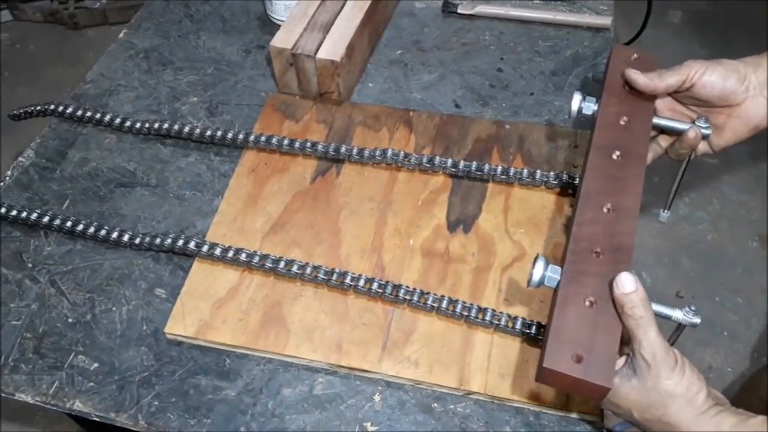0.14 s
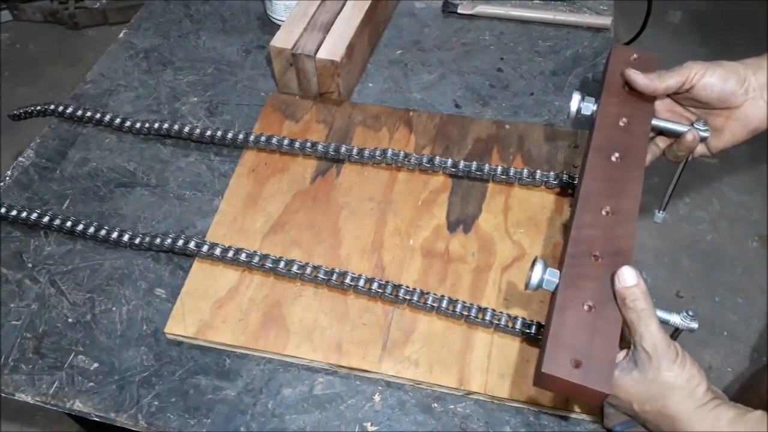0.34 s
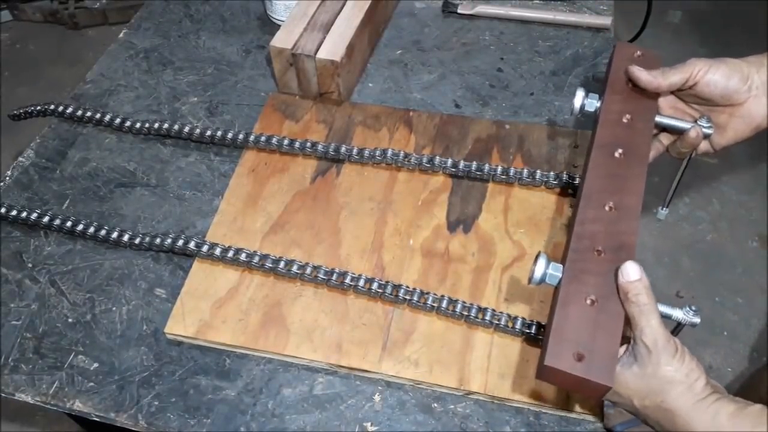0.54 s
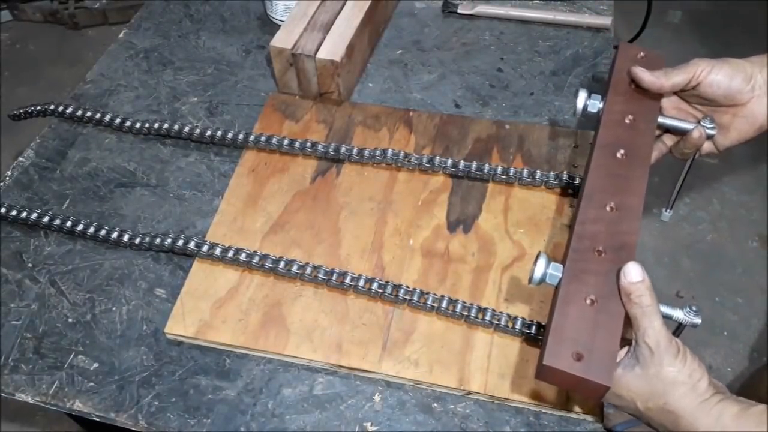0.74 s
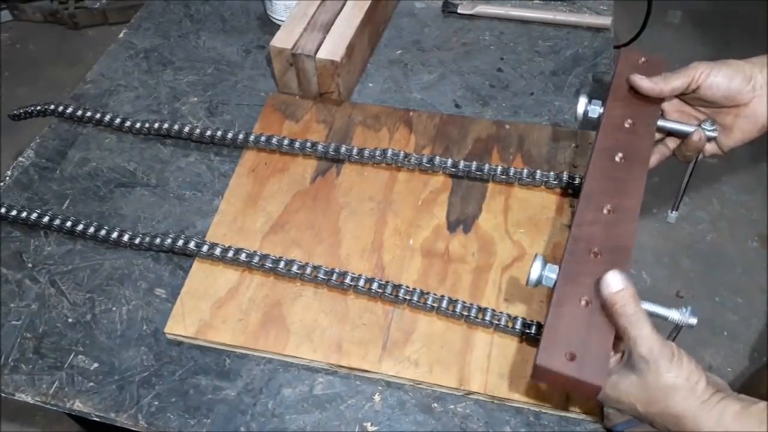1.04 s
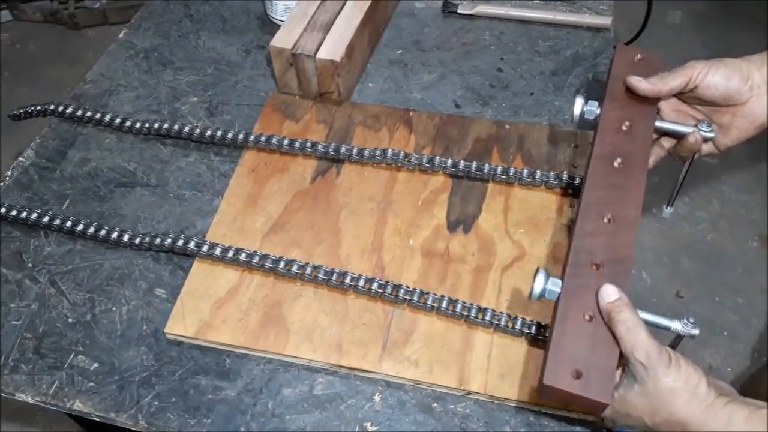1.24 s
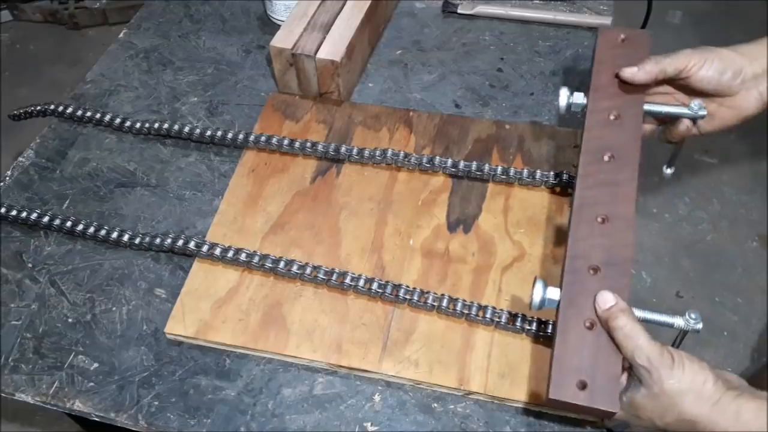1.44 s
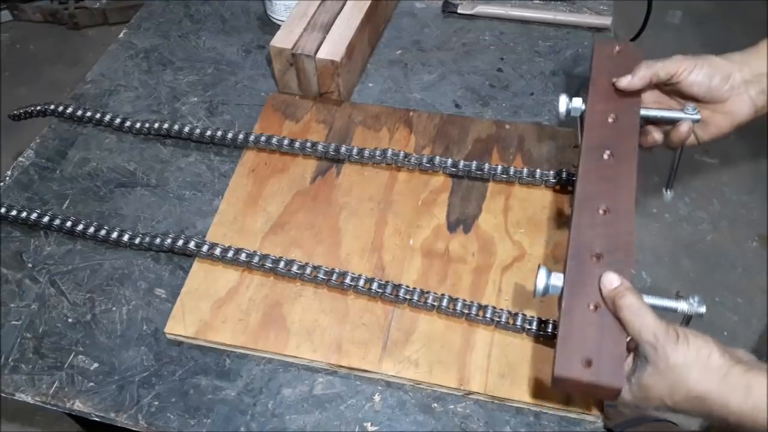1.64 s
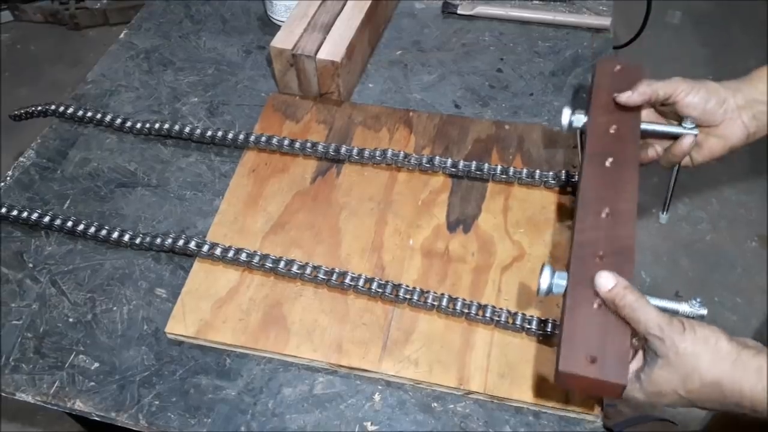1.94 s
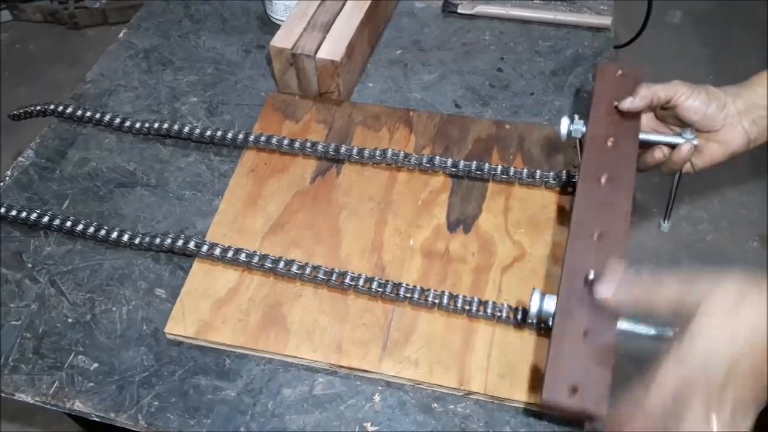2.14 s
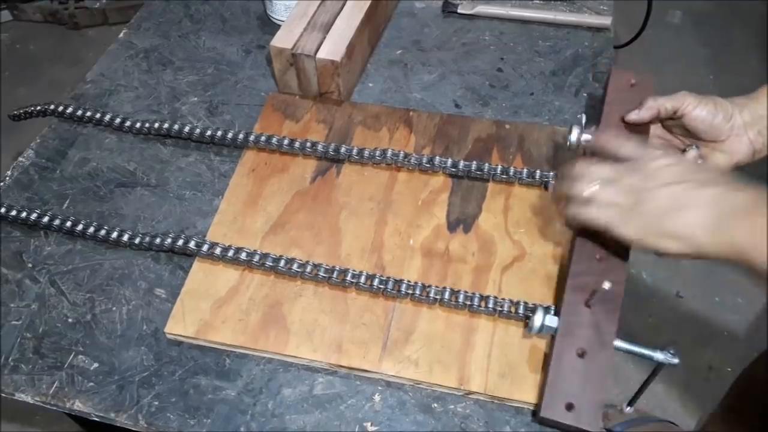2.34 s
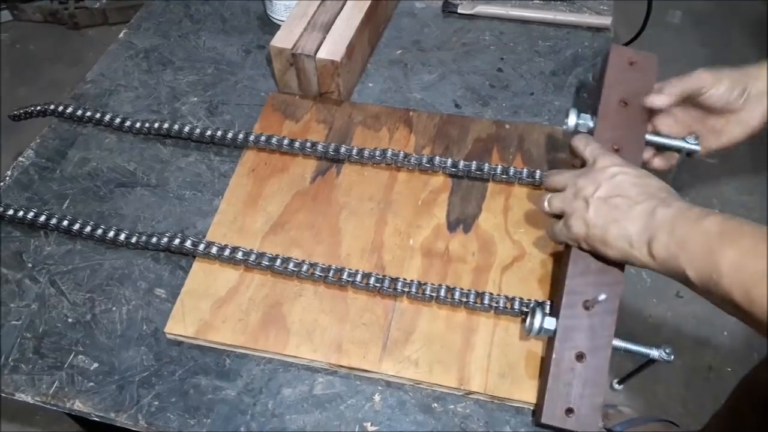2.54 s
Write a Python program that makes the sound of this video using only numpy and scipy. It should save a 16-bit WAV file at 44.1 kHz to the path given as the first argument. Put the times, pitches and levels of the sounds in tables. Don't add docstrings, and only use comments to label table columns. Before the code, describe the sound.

A wooden bar carrying steel screws and chains is nudged over plywood with dull bumps and faint rubbing, then drops with a hard clack, thin steel ringing and a final metal tick; close microphone, quiet workshop.

```python
import sys
import numpy as np
from scipy import signal
from scipy.io import wavfile

SR = 44100
rng = np.random.default_rng(int(sys.argv[2]) if len(sys.argv) > 2 else 0)


def store_pcm(level_fs):
    pcm = np.round(np.clip(level_fs, -1, 1) * 32767).astype(np.int16)
    wavfile.write(sys.argv[1], SR, np.atleast_2d(pcm).T)


def elevation(decibels):
    levels = np.asarray(decibels, float)
    return 10 ** (levels / 20)


N = 119070

# (frequency [Hz], level [dB], t60 [s])
BOARD_MODES = [(102, -19, 0.076), (144.8, -3, 0.12), (234, -2, 0.11), (274, -5.5, 0.085), (343, -0.5, 0.13),
               (402.7, -0.5, 0.085), (473, -2, 0.074), (541, -0.5, 0.021), (644, -6, 0.035),
               (763, -1.5, 0.031), (1055, 2.5, 0.023), (1232, -3.5, 0.039), (1570, -4.5, 0.011),
               (2140, -7, 0.015), (2650, -3, 0.012)]


def rms_one(x):
    return x / np.sqrt(np.mean(x ** 2) + 1e-20)


def at_hz(points, hz):
    table_hz, values = np.transpose(points)
    return np.interp(np.log(hz), np.log(table_hz), values)


def drift(rate_hz):
    r = np.exp(-40 * np.pi * rate_hz / SR)
    slow = signal.lfilter([1], [1, -2 * r, r * r], rng.standard_normal(N // 20 + 2002))[2000:]
    return np.interp(np.arange(N) / 20, np.arange(len(slow)), rms_one(slow - slow.mean()))


def ring(clicks, hz, t60):
    r = elevation(-60 / (t60 * SR))
    w = 2 * np.pi * hz / SR
    return signal.lfilter([0, np.sin(w)], [1, -2 * r * np.cos(w), r * r], clicks + 1e-18)


def band_noise(noise, low_hz, high_hz, order=2):
    return signal.sosfilt(signal.butter(order, [low_hz, high_hz], "band", fs=SR, output="sos"), noise)


def low_pass(x, hz, order=2):
    return signal.sosfilt(signal.butter(order, hz, fs=SR, output="sos"), x)


def bands():
    edges = 25 * 2 ** np.arange(0, 9.6, .5)
    white = rng.standard_normal((2, N))
    for k, (low, high) in enumerate(zip(edges, edges[1:])):
        yield np.sqrt(low * high), band_noise(white[k % 2], low, high)


def clicks_at(s, gain):
    out = np.zeros(N)
    np.add.at(out, (np.asarray(s) * SR).astype(int), gain)
    return out


def insects():
    throb_per_s, throb_peak_s, throb_db = 7.33, .015, 3.5
    pulses_per_s, pulse_db = 450, 3
    t = np.arange(N) / SR
    throb = np.tanh(1.6 * np.cos(2 * np.pi * throb_per_s * (t - throb_peak_s)))
    pulses = np.cos(2 * np.pi * pulses_per_s * t + 0.85 * drift(5.7))
    level_db = throb_db * throb + pulse_db * pulses + 1.87 * drift(1.54)
    noise = rng.standard_normal(N) * elevation(level_db)
    return elevation(-68) * rms_one(band_noise(noise, 6157, 6756, order=4))


def air():
    # (frequency [Hz], density [dB per Hz])
    spectrum = [(35, -33), (70, 7), (160, 5), (730, -11), (2000, -17.5), (5000, -16.5), (10000, -21),
                (16000, -22)]
    tone = sum(elevation(at_hz(spectrum, hz) + drift(9.3)) * noise for hz, noise in bands())
    return elevation(-70.5) * rms_one(tone)


def drag():
    # (start [s], length [s], level [dB], brightness [dB per octave])
    strokes = [(0, 0.1, -71, -5), (0.236, 0.21, -61, -15), (0.358, 0.097, -50.5, -11.5),
               (0.548, 0.12, -68.5, -7.5), (0.699, 0.064, -72.5, -1), (0.872, 0.085, -55, -10),
               (1.04, 0.11, -42.5, -5), (1.119, 0.063, -42.5, -9.5), (1.193, 0.36, -80, 0.5),
               (1.474, 0.16, -54.5, -7), (1.57, 0.13, -54, -7), (1.69, 0.75, -60, -8.5),
               (1.928, 0.29, -55.5, -2.5), (1.965, 0.16, -50.5, -17), (2.121, 0.53, -52.5, -2.5),
               (2.483, 0.087, -37.5, -4.5)]
    rise_s, fall_s = 0.005, 0.075
    slips_per_s, spread_db = 390, 0
    t, out = np.arange(N) / SR, 0
    shapes = []
    for s, length, _, _ in strokes:
        fall = np.exp(-np.maximum(t - s - length + fall_s, 0) / fall_s)
        shapes.append(np.clip((t - s) / rise_s, 0, 1) * fall)
    judder = elevation(1.4 * drift(45))
    for hz, level_db, t60 in BOARD_MODES[:-1]:
        sizes = elevation(spread_db * np.minimum(rng.exponential(1, N), 4)) * rng.choice([-1, 1], N)
        slips = rms_one(sizes * (rng.random(N) < slips_per_s / SR))
        power = 0
        for (_, _, db, slope_db), shape in zip(strokes, shapes):
            power = power + (elevation(db + slope_db * np.log2(hz / 200)) * shape) ** 2
        rumble = ring(slips * np.sqrt(power) * judder, hz, 0.33 * t60)
        out = out + rumble * elevation(level_db) / np.sqrt(t60 * SR / 46)
    return elevation(-4) * out


def rubs():
    # (start [s], length [s], level [dB], centre [Hz], width [Hz])
    strokes = [(0.252, 0.074, -78, 4500, 1300), (0.251, 0.088, -73, 8700, 1600),
               (1.043, .076, -70.5, 7400, 5100), (1.052, 0.11, -73, 5030, 310),
               (1.046, 0.11, -63, 1850, 260), (1.132, .22, -73.5, 1804, 180), (1.053, .12, -76, 3170, 280),
               (1.315, 0.53, -79.5, 8360, 1300), (1.7, 0.36, -77, 3650, 500),
               (1.49, 0.86, -78.5, 5340, 570), (1.6, 0.32, -74.5, 4600, 3400), (2.3, .065, -51, 530, 390),
               (1.935, 0.18, -66.5, 2200, 240), (1.939, 0.18, -60.5, 1210, 260),
               (1.481, 0.039, -63, 540, 52), (1.721, 0.076, -74, 1165, 130), (1.55, 0.28, -82.5, 2170, 520),
               (1.936, 0.206, -74.5, 8500, 4800), (0.393, 0.066, -79, 1830, 520),
               (2.075, 0.29, -66, 6100, 4000), (2.6, 0.19, -67, 9800, 4300),
               (2.125, 0.08, -57.5, 2760, 610), (2.171, 0.18, -62, 1710, 440)]
    rise_share, fall_share, flicker_db = 0.13, .5, 3
    t, out = np.arange(N) / SR, 0
    for s, length, db, hz, width_hz in strokes:
        noise = band_noise(rng.standard_normal(N), max(hz - width_hz / 2, 50), hz + width_hz / 2)
        rise = (t - s) / (rise_share * length)
        fall = (s + length - t) / (fall_share * length)
        shape = np.clip(np.minimum(rise, fall), 0, 1)
        out = out + elevation(db + flicker_db * drift(44)) * shape * rms_one(noise)
    return out


def knocks():
    # (time [s], peak level [dB], contact cut-off [Hz])
    contacts = [(0.283, -44.5, 402), (0.372, -29, 324), (.372, -53, 1300), (0.384, -32.5, 280),
                (0.913, -43, 403), (1.049, -55, 800), (1.079, -46, 700), (1.165, -28.5, 460),
                (1.177, -41.5, 1450), (1.988, -39, 420), (1.492, -50.5, 800), (2.2544, -33, 500),
                (2.271, -14, 3000), (2.2721, -2.5, 2080), (2.2727, -1, 2090), (2.275, -11, 1000),
                (2.2835, -4.5, 780), (2.2917, -8, 700), (2.305, -9, 2020), (2.453, -13.5, 1404),
                (2.457, -21, 1900), (2.467, -15, 600)]
    # (frequency [Hz], density [dB per Hz])
    rustle_spectrum = [(60, -36), (130, -7.5), (460, 2), (750, -6.5), (1250, -3.5), (3000, -17),
                       (8000, -20.5), (16000, -31)]
    # (frequency [Hz], t60 [s])
    rustle_t60 = [(100, 0.073), (1500, 0.066), (12000, 0.35)]
    soft_hz, rattle_from_hz, hard_bass_share = 600, 660, 0.23
    rustle_db, rustle_rise_s, grain_spread_db = -11.5, 0.00072, 3.5
    soft_slope, crack_db = 1.52, -51
    out = np.zeros(N)
    luck = rng.standard_normal((len(contacts), len(BOARD_MODES)))
    s, db, cut_hz = np.transpose(contacts)
    soft = cut_hz < soft_hz
    for k, (hz, level_db, t60) in enumerate(BOARD_MODES):
        bass = 1 / (1 + (hard_bass_share * cut_hz / hz) ** 2)
        reach = bass / (1 + (hz / cut_hz) ** 2) ** 1.17
        force = elevation(db + level_db - 12.0 + 3.75 * luck[:, k]) * reach
        padded = low_pass(clicks_at(s, force * soft) + 1e-18, soft_hz)
        out += ring(padded + clicks_at(s, force * ~soft), hz, t60)
    grain_db = grain_spread_db * drift(100)
    rise = np.exp(-1 / (rustle_rise_s * SR))
    loose = np.minimum(cut_hz / rattle_from_hz, 1) ** 2
    for hz, noise in bands():
        bass = 1 / (1 + (hard_bass_share * cut_hz / hz) ** 2)
        reach = bass / (1 + (hz / cut_hz / soft_slope) ** 2) ** 3
        reach = reach + elevation(crack_db) * (cut_hz > 1400)
        decay = elevation(-120 / (at_hz(rustle_t60, hz) * SR))
        power = signal.lfilter([1], [1, -decay], clicks_at(s, elevation(2 * db) * reach * loose) + 1e-18)
        power = signal.lfilter([1 - rise], [1, -rise], power)
        level_db = rustle_db + at_hz(rustle_spectrum, hz) + grain_db * (hz > 2000)
        out += 10 * elevation(level_db) * noise * np.sqrt(power)
    return out


def steel():
    # (time [s], peak level [dB], colour [Hz], link ring level [dB])
    ticks = [(1.584, -54.5, 8300, -39), (1.9366, -37.5, 6400, -19), (2.108, -52, 5500, -40),
             (2.128, -45.5, 2450, -17), (2.136, -43, 2800, -19), (2.142, -47, 5150, -35),
             (2.243, -43, 9400, -18), (2.158, -43, 5200, -16), (2.1692, -31.5, 5940, -18),
             (2.171, -45, 9900, -33), (2.1829, -31.5, 6550, -13), (2.5894, -21, 2160, -46),
             (2.2747, -17, 8100, -24), (2.2725, -17.5, 4560, -29), (2.2822, -21.5, 7100, -41),
             (2.287, -20, 7100, -22), (2.2862, -24, 12500, -36), (2.309, -27, 9500, -27),
             (2.3054, -12, 5000, -25.5), (2.4295, -43, 9500, -36), (2.454, -28.5, 8670, -43),
             (2.473, -40, 6900, -30), (2.5895, -28.5, 6850, -47)]
    # (frequency [Hz], level [dB], t60 [s])
    link_modes = [(9950, 0, .05), (5260, -8, .025), (3100, -8, .04)]
    # (frequency [Hz], level [dB], t60 [s])
    handle_modes = [(1725, -5, .1), (1800, -10, .06), (3085, -10, .16), (2960, -14, .12), (3200, -16, .06),
                    (5000, -14, .03), (3600, -16, .02)]
    tick_t60_s, broad_db = 0.0068, -8
    handle_s, handle_db, rattle_db, rattle_t60_s = 2.5895, -30, -35, 0.25
    out, t = np.zeros(N + SR), np.arange(800) / SR
    bursts = rng.standard_normal((len(ticks), 800)) * elevation(-60 * t / tick_t60_s)
    bursts = low_pass(np.diff(bursts, prepend=0), 13900)
    for (s, db, hz, _), burst in zip(ticks, bursts):
        tick = rms_one(ring(burst, hz, 9.0 / hz)) + elevation(broad_db) * rms_one(burst)
        start = int(s * SR)
        out[start:start + 800] += elevation(db) * tick / np.abs(tick).max()
    out = out[:N]
    s, db, _, link_db = np.transpose(ticks)
    link_clicks = clicks_at(s, elevation(db + link_db))
    since = np.arange(N) / SR - handle_s
    rattle = elevation(rattle_db - 60 * np.abs(since) / rattle_t60_s) * (since > 0) * rng.standard_normal(N)
    handle_clicks = elevation(handle_db) * (clicks_at([handle_s], 0.9) + rattle)
    for modes, clicks in ((link_modes, link_clicks), (handle_modes, handle_clicks)):
        rings = sum(elevation(level_db) * ring(clicks, hz, t60) for hz, level_db, t60 in modes)
        out = out + elevation(3.0 * drift(54)) * rings
    return out


def squeak():
    # (time [s], frequency [Hz], level [dB])
    glide = [
        (1.65, 7850, -84),
        (1.69, 7950, -76),
        (1.728, 8850, -78),
        (1.752, 8950, -104),
        (1.775, 8850, -79),
        (1.825, 8200, -78),
        (1.88, 7900, -84),
    ]
    s, hz, db = np.transpose(glide)
    t = np.arange(N) / SR
    phase = 2 * np.pi * np.cumsum(np.interp(t, s, hz) + 25 * drift(80)) / SR
    level_db = np.interp(t, s, db, left=-140, right=-140) + 6.0 * drift(62)
    return elevation(level_db) * np.sqrt(2) * np.sin(phase)


def screw():
    # (time [s], lower mode level [dB], upper mode level [dB], damped at [s], damping time [s])
    rings = [
        (1.937, -75, -63, 2.0, .04),
        (2.17, -70, -57, 2.178, .004),
        (2.2905, -28, -38, 2.305, .002),
        (2.3075, -34, -44, 2.345, .001),
        (2.346, -34, -40, 2.405, .022),
        (2.473, -57, -58, 2.54, .03),
        (2.5905, -49, -45, 2.65, .08),
    ]
    # (lower [Hz], upper [Hz])
    pair_hz = (8931, 8973)
    rise_s, t60_s = 0.0006, .6
    t, out = np.arange(N) / SR, 0
    for s, low_db, high_db, stop, damp_s in rings:
        rise = np.clip((t - s) / rise_s, 0, 1)
        damping = np.exp(-np.maximum(t - stop, 0) / damp_s)
        decay = elevation(-60 * np.maximum(t - s, 0) / t60_s)
        levels = zip(pair_hz, (low_db, high_db))
        tones = sum(elevation(db) * np.sin(2 * np.pi * hz * (t - s)) for hz, db in levels)
        out = out + rise * damping * decay * tones
    return out


def chain():
    # (start [s], swell [s], peak level [dB], fall [s])
    jostles = [
        (2.11, .075, -56.5, 0.05),
        (2.275, 0.015, -41.5, 0.015),
        (2.454, .01, -62, 0.016),
        (2.59, .01, -58, 0.02),
    ]
    # (frequency [Hz], level [dB], t60 [s])
    link_modes = [(3190, -2, 0.013), (4350, -10, 0.0027), (5270, -1, 0.018), (6700, -9, .007),
                  (7900, -1, 0.0045), (9800, -4.5, .015), (12500, -14, .004)]
    hits_per_s, spread_db = 900, 2.5
    t, force = np.arange(N) / SR, 0
    for s, swell, db, fall in jostles:
        rise = np.clip((t - s) / swell, 0, 1) ** 2
        force = force + elevation(db) * rise * np.exp(-np.maximum(t - s - swell, 0) / fall)
    sizes = elevation(spread_db * np.minimum(rng.exponential(1, N), 3))
    hits = (rng.random(N) < hits_per_s / SR) * sizes * force
    return sum(elevation(db) * ring(hits * rng.standard_normal(N), hz, t60) for hz, db, t60 in link_modes)


def workshop(x):
    t60_s, first_wall_s, build_s = 0.45, .006, 0.0046
    t = np.arange(SR) / SR
    tail = rng.standard_normal(SR) * elevation(-60 * t / t60_s) * np.clip((t - first_wall_s) / build_s, 0, 1)
    tail = low_pass(tail, 7900, order=1)
    return signal.fftconvolve(x, tail / np.sqrt(np.sum(tail ** 2)))[:N]


def scene():
    background = insects() + air()
    bench = drag() + rubs() + knocks() + steel() + squeak() + chain()
    return (background + bench + elevation(-11.5) * workshop(bench) + screw())[None]


def top_cut(x):
    return signal.sosfilt(signal.butter(12, 16990, fs=SR, output="sos"), x)


def record(dry):
    low_hz, top_hz, overload = 87.5, 16700, .97
    x = signal.sosfilt(signal.butter(4, low_hz, "high", fs=SR, output="sos"), dry)
    x = np.clip(x, -overload, overload)
    mix = signal.sosfilt(signal.cheby2(12, 60, top_hz, fs=SR, output="sos"), x)
    return top_cut(mix)


dry = scene()
out = record(dry)
store_pcm(out)
```